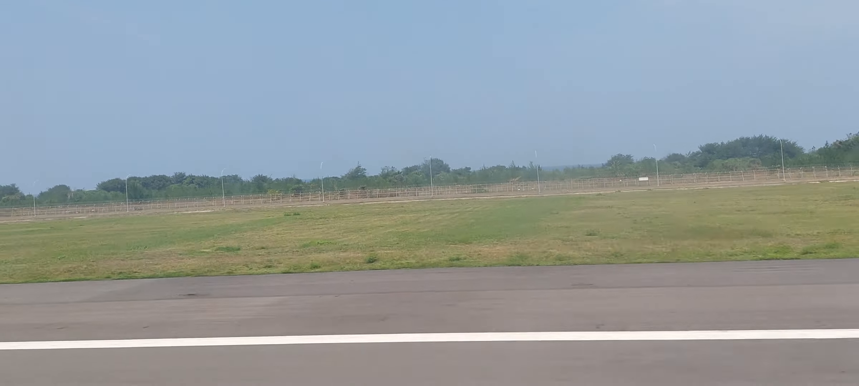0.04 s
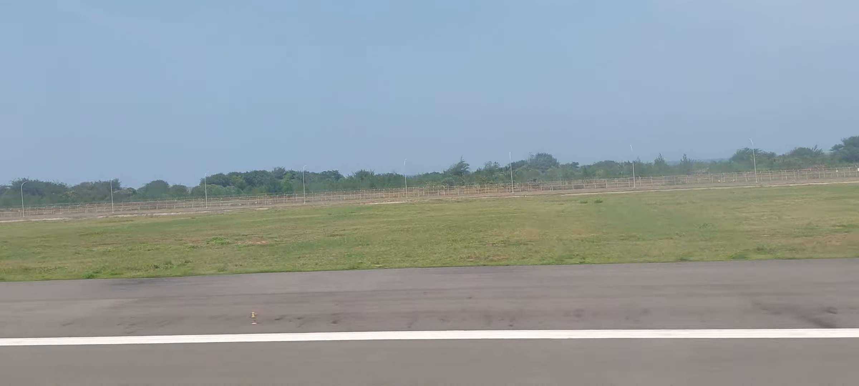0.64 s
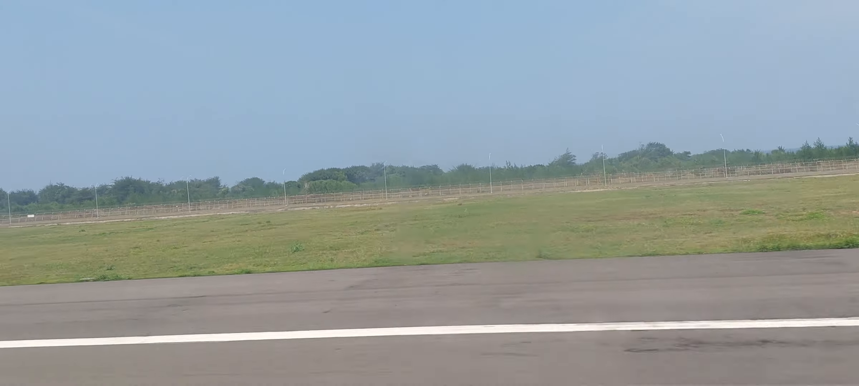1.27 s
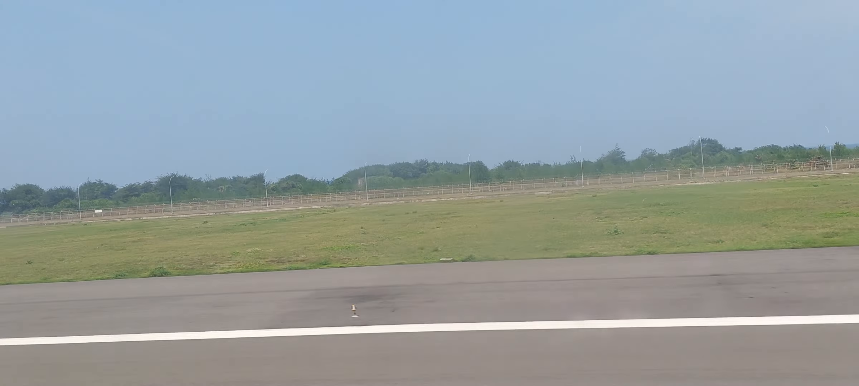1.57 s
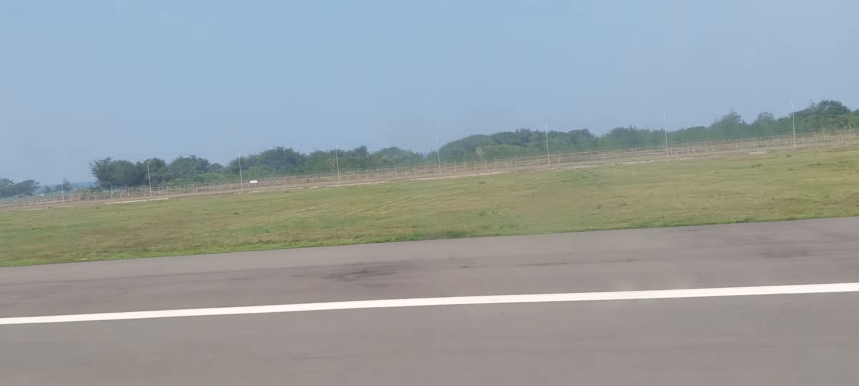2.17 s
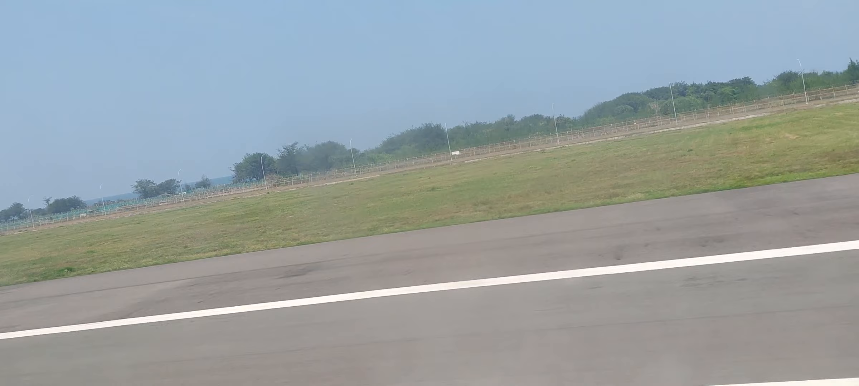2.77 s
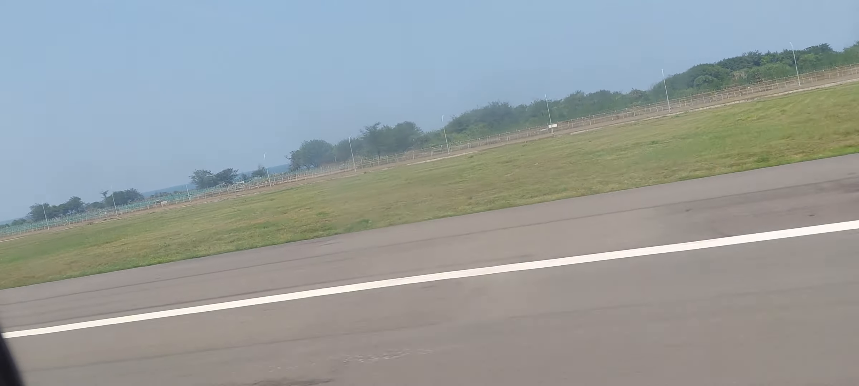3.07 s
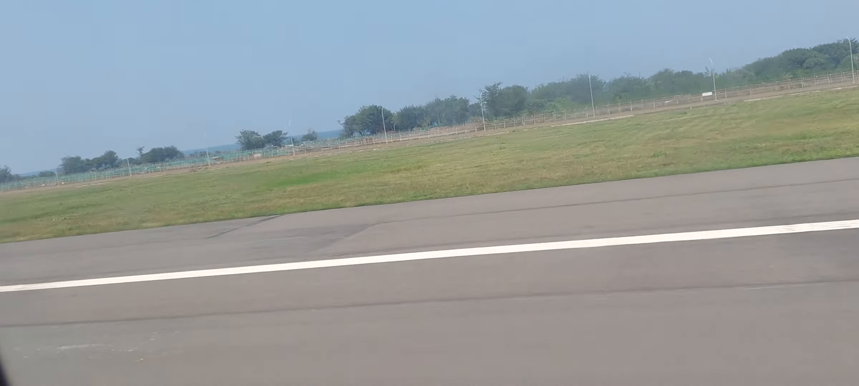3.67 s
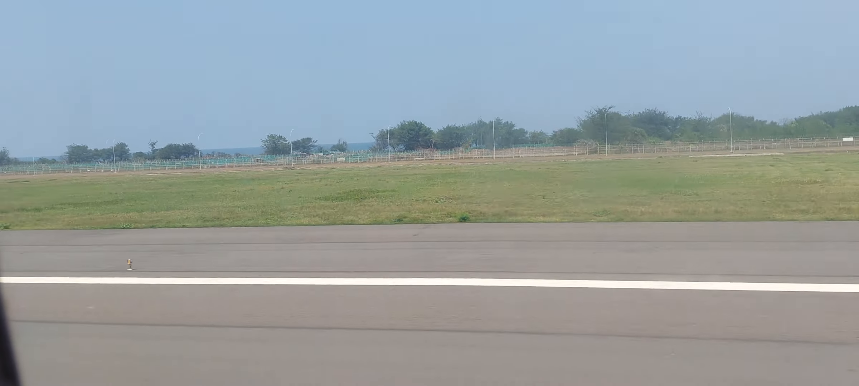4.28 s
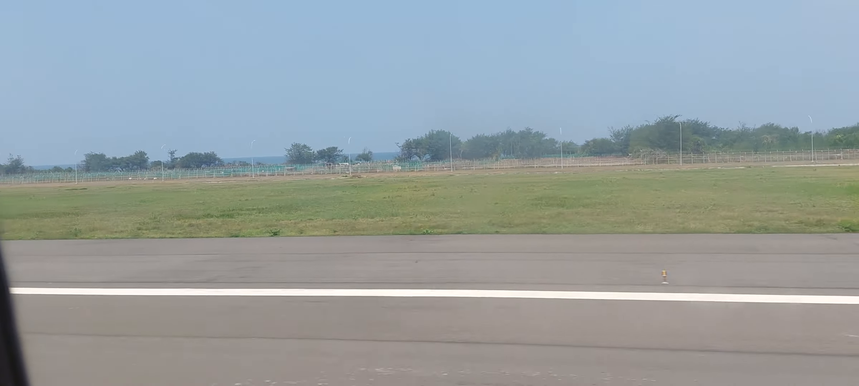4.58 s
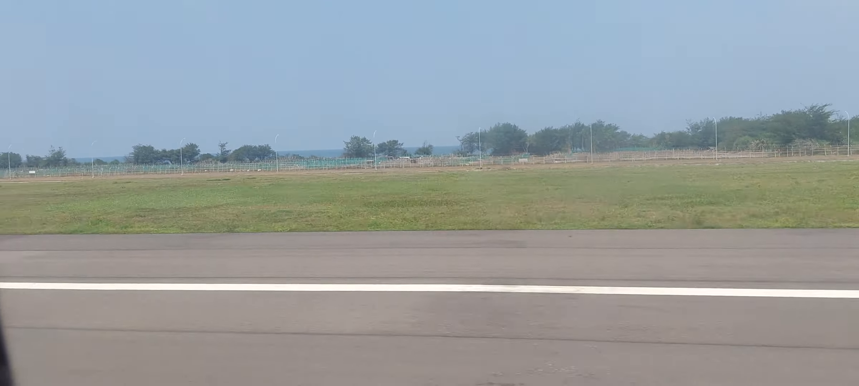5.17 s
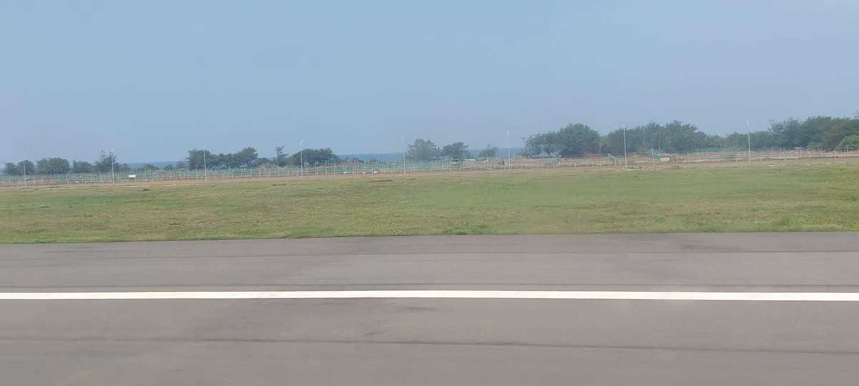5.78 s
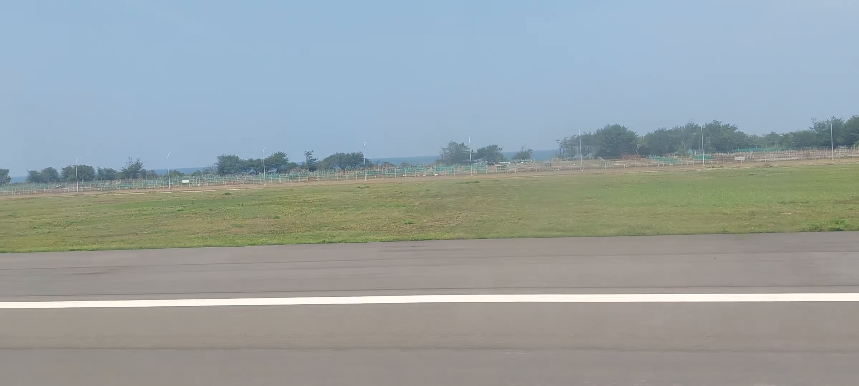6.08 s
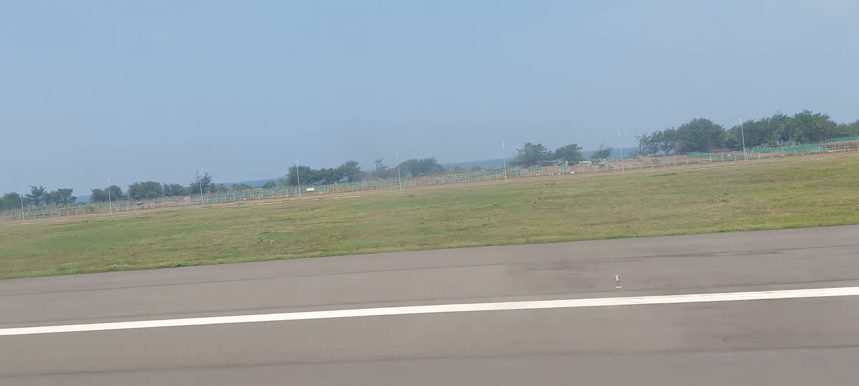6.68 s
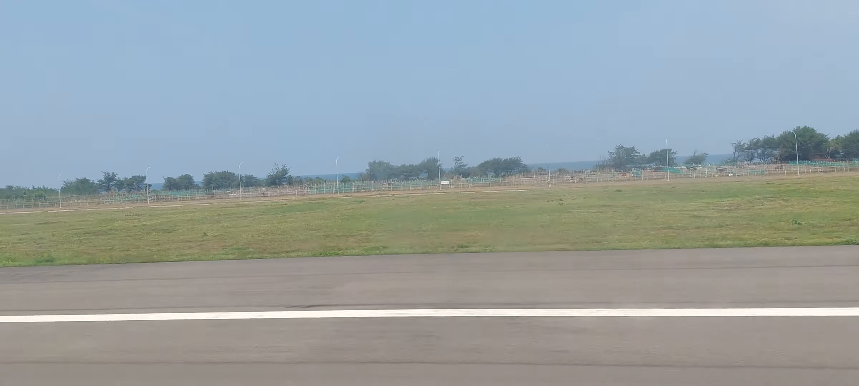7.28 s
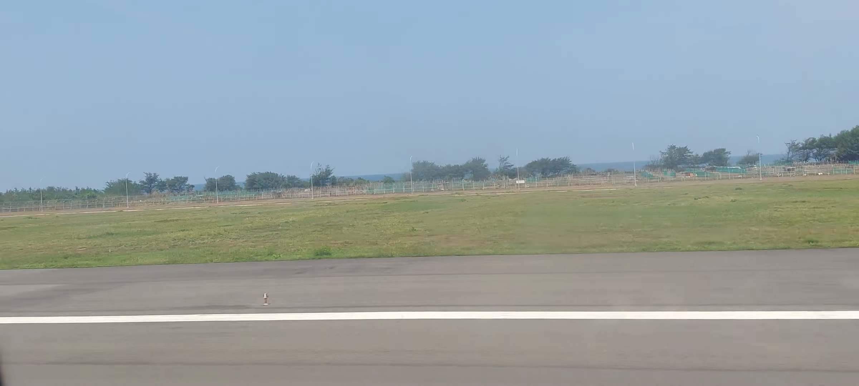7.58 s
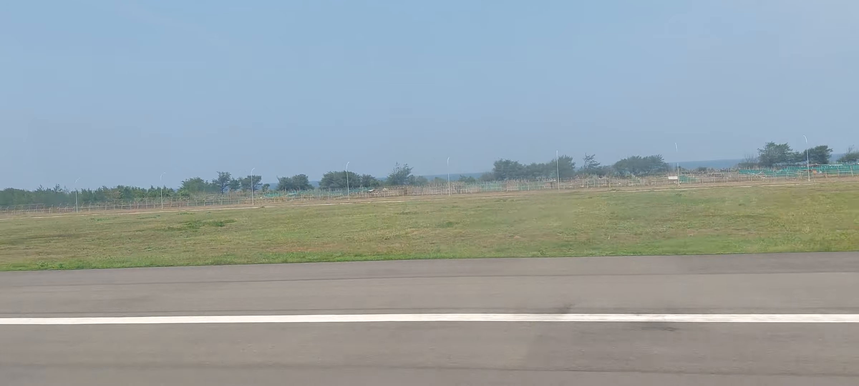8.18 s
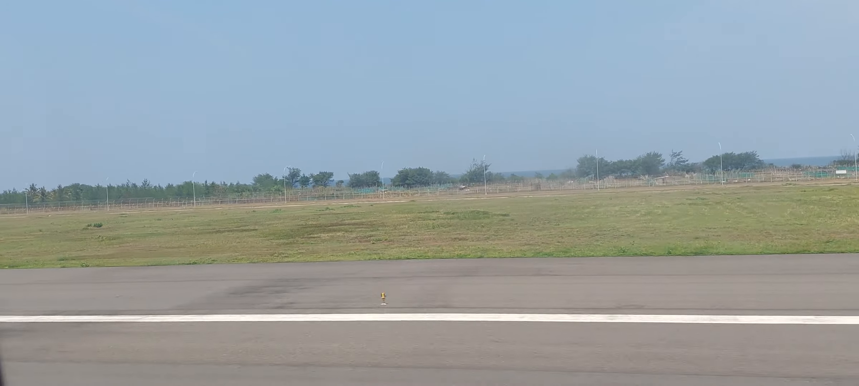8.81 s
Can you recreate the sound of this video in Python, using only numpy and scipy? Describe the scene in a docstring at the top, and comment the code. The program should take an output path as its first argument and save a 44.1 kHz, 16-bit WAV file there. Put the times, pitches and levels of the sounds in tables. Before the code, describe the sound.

An airliner gathers speed on a runway, heard inside the cabin: swelling engine roar, tyre rumble, hissing air and light rattles.

```python
"""A low undercarriage shudder comes first, as an airliner gathers speed on the runway.
Tyre rumble and engine roar swell through the fuselage, and air rushes along the skin.
Air hisses on the right, brighter for a while; trim panels chatter, jolts rattle loose fittings
and a faint fan whine emerges. Heard at a cabin window through the two microphone ports
of a hand-held phone, whose limiter holds the peaks."""
import sys
import numpy as np
from scipy import signal
from scipy.fft import rfft, irfft
from scipy.io import wavfile
from scipy.ndimage import uniform_filter1d, minimum_filter1d

SR = 44100
rng = np.random.default_rng(int(sys.argv[2]) if len(sys.argv) > 2 else 0)


def dump_mix(stems):
    """Bounce the given channels to the path in sys.argv[1] as a 16-bit WAV at rate SR."""
    frames = np.atleast_2d(stems).T  # one column per channel
    limited = np.clip(frames, -1, 1)  # hard clip at full scale
    pcm = np.round(limited * 32767).astype(np.int16)
    wavfile.write(sys.argv[1], SR, pcm)


N = 399105
T = np.arange(N) / SR
FREQ = np.fft.rfftfreq(N, 1 / SR)


def undb(db):
    """Decibels to gain."""
    return 10 ** (np.asarray(db) / 20)


def unit(x):
    """Scale to rms 1."""
    return x / np.sqrt(np.mean(x ** 2))


def pan(db):
    """Channel gains for a left minus right level."""
    return undb(np.array([[db], [-db]]) / 2)


def smooth(x, samples):
    """Two passes of a moving average."""
    return uniform_filter1d(uniform_filter1d(x, samples), samples)


def white():
    """Independent white noise, left and right."""
    return rng.standard_normal((2, N))


def walk(rate_hz):
    """Smooth random drift, rms 1."""
    hold = max(int(SR / rate_hz), 1)
    steps = np.repeat(rng.standard_normal(N // hold + 1), hold)
    return unit(smooth(steps, hold)[:N])


def curves(table):
    """The columns of a timed table, one value a sample."""
    times, *columns = np.transpose(table)
    return [np.interp(T, times, column) for column in columns]


def across(points):
    """A table over frequency, joined on a log axis."""
    hz, value = np.transpose(points)
    return np.interp(np.log(FREQ + 1), np.log(hz), value)


def colour(x, points):
    """Filter by a spectrum that rolls off past its ends; white noise keeps its power."""
    low_hz, high_hz = points[0][0], points[-1][0]
    ends = 1 / (1 + (low_hz / (FREQ + 1)) ** 4) / (1 + (FREQ / (2 * high_hz)) ** 6)
    return irfft(rfft(x) * unit(undb(across(points)) * ends), N)


def resonate(x, modes):
    """Filter by narrow peaks and dips."""
    gain_db = sum(db / (1 + (2 * (FREQ - hz) / width) ** 2) for hz, width, db in modes)
    return irfft(rfft(x) * undb(gain_db), N)


def spell(start, length, edge_s):
    """Envelope 0-1 that rises, holds and falls smoothly."""
    return (np.tanh(2 * (T - start) / edge_s) - np.tanh(2 * (T - start - length) / edge_s)) / 2


def lifts(table, edge_s):
    """Level change in dB from a table of passing spells."""
    return sum(db * spell(start, length, edge_s) for start, length, db in table)


def burst(start, t60, rise_s):
    """Envelope of one contact: quick rise, exponential decay."""
    age = np.clip(T - start, 0, None)
    return (1 - np.exp(-age / rise_s)) * np.exp(-np.minimum(np.log(1000) * age / t60, 50))


# Each row: start in seconds, length in seconds, level in dB.
SHUDDER_BOUTS = [(0.175, 0.11, -13.5), (0.479, 0.096, -12.5), (0.672, .27, -17), (1.119, 0.29, -19.5),
                 (1.38, .42, -13), (1.8, 0.33, -19.5), (2.8, 0.15, -14.5), (3.071, 0.54, -13),
                 (3.697, 0.081, -13.5), (4.244, 0.1, -15)]
# Each row: time in seconds, pitch in Hz.
SHUDDER_PITCH = [(0, 49), (.2, 55), (.8, 54.23), (1.45, 57.3), (2.0, 56.5), (2.45, 52.04), (2.85, 54.7),
                 (3.2, 53.3)]

def shudder(tremor_db=-21.5, waver_db=1.73, edge_s=.023):
    """The undercarriage shakes the fuselage at one low resonance, in bouts that stop as speed builds."""
    hz, = curves(SHUDDER_PITCH)
    tone = np.sqrt(2) * np.sin(2 * np.pi * np.cumsum(hz) / SR)
    bouts = sum(undb(db) * spell(start, length, edge_s) for start, length, db in SHUDDER_BOUTS)
    tremor = undb(tremor_db) * spell(0, 4, edge_s)
    return tone * np.hypot(bouts, tremor) * undb(waver_db * walk(18)) * pan(-4)


# Each row: frequency in Hz, correlation between the ports from 0 to 1.
PORT_LIKENESS = [(60, 0.98), (140, 0.98), (290, 0.92), (640, .42), (1300, 0)]
# Wall panel resonances. Each row: centre in Hz, width in Hz, gain in dB.
WALL_MODES = [(528, 34, 3.5), (770, 26, 0.5), (893, 60, 3), (917, 60, -3), (1030, 60, 2.5), (1290, 55, 1.5),
              (1920, 110, 2), (2100, 130, -2.5)]

def cabin_field():
    """Diffuse noise through the wall panels: alike at both ports in the bass, unrelated in the treble."""
    mid, side = rfft(white())
    like = np.clip(across(PORT_LIKENESS), 0, 1)
    ports = mid * np.sqrt(1 + like) + np.array([[1], [-1]]) * side * np.sqrt(1 - like)
    return resonate(irfft(ports, N), WALL_MODES)


# Each row: frequency in Hz, left minus right in dB.
PORT_BALANCE = [(60, -4), (110, -2.5), (200, -2.5), (290, 0.4), (380, 0.17), (700, -2)]

def drone(spectrum, span_s):
    """Low cabin noise, its power held steady over spans longer than span_s."""
    balance = undb(np.array([[1], [-1]]) * across(PORT_BALANCE) / 2)
    noise = colour(irfft(rfft(cabin_field()) * balance, N), spectrum)
    power = smooth(noise.mean(axis=0) ** 2, int(span_s * SR))
    return noise / np.sqrt(power + 1e-12)


# Each row: time in seconds, relative level in dB.
ROAR_LEVEL = [(0, -27), (1.2, -26.7), (1.6, -25), (2.15, -25), (2.6, -21.5), (3.15, -22.5), (4.05, -15.5),
              (4.3, -17), (4.65, -15), (5.8, -15), (7.3, -16), (9.05, -15.5)]
# Each row: frequency in Hz, relative level in dB.
ENGINE_SPECTRUM = [(130, -15.5), (175, -3), (220, 0.5), (265, -6.5), (300, -10), (350, -11), (410, -16.5),
                   (470, -26.5), (540, -28.5), (680, -34), (880, -37.5), (1100, -53)]

def engines(gain_db=.5, sway_db=.23):
    """The engine roar builds behind the wall, then holds."""
    level_db = curves(ROAR_LEVEL)[0] + gain_db + sway_db * walk(5)
    return drone(ENGINE_SPECTRUM, span_s=.15) * undb(level_db)


def with_roar(full_db, growth, full_roar_db=-16):
    """Level in dB: full_db at full roar, moving by growth dB per dB of roar."""
    return full_db + growth * (curves(ROAR_LEVEL)[0] - full_roar_db)


# Each row: frequency in Hz, relative level in dB.
TYRE_SPECTRUM = [(22, -33.5), (35, -18), (50, -8), (75, -3), (105, -1), (135, .5), (175, -7), (230, -20.5),
                 (400, -55)]
# Each row: start in seconds, length in seconds, lift in dB.
ROUGH_STRETCHES = [(2.2, 0.25, 4.5), (2.47, .53, 2), (3.85, 1.12, 2.5), (5.2, 0.36, 1.5), (6.25, 0.27, 2)]

def tyres():
    """Tyres drum through the floor, harder on rough stretches of runway."""
    level_db = with_roar(full_db=-12.5, growth=.74) + lifts(ROUGH_STRETCHES, edge_s=.058)
    return drone(TYRE_SPECTRUM, span_s=.2) * undb(level_db)


# Each row: frequency in Hz, left and right relative levels in dB.
RUSH_SPECTRA = [(358, -70.5, -66.5), (526, -68.5, -66.5), (670, -72, -69), (850, -76, -71.5),
                (1050, -77, -72), (1280, -79, -76), (1600, -82, -75.5), (2060, -86, -83), (3250, -93, -100),
                (4400, -97, -108), (5630, -101, -104), (8500, -108, -119), (9900, -110, -115),
                (11600, -108, -104), (15300, -114, -120)]
# Runway bumps. Each row: start in seconds, length in seconds, lift of the trim chatter in dB.
BUMPS = [(.35, 0.45, 5.5), (.85, 0.35, 4.5), (1.32, 0.15, 6.5), (5.15, 0.3, 3.5)]

def rush(bump_share=.2, flutter_db=.46):
    """Air rushes along the skin, louder with speed and on bumps; each port hears its own colour."""
    table = np.array(RUSH_SPECTRA)
    shapes = undb([across(table[:, [0, port]]) for port in (1, 2)])
    low_cut = 1 / (1 + (table[0, 0] / (FREQ + 1)) ** 4)
    air = irfft(rfft(cabin_field()) * shapes * low_cut, N)
    level_db = with_roar(full_db=-42.5, growth=.52) + bump_share * lifts(BUMPS, edge_s=.04)
    return air / np.std(air.mean(axis=0)) * undb(level_db + flutter_db * walk(12))


# Each row: time in seconds, relative level in dB.
HISS_LEVEL = [(0, -69), (.8, -62), (1.5, -60), (2.05, -54), (3.2, -55), (4.15, -54), (5.0, -52.5),
              (6.3, -52.5), (7.6, -57.5), (9.05, -54.5)]
# Brief swells and dips. Each row: start in seconds, length in seconds, change in dB.
HISS_GUSTS = [(.68, 0.093, 4), (.92, 0.21, 2.5), (1.3, .14, 4.5), (1.62, 0.086, 4.5), (2.52, .2, 1.5),
              (3.55, .2, 2.5), (5.62, .28, -6), (6.38, .85, -5), (7.25, .14, 3)]
# Each row: time in seconds, low-pass cutoff in Hz.
HISS_CUTOFF = [(0, 2900), (1.2, 3190), (1.82, 4430), (2.0, 7345), (4.0, 7200), (4.75, 6200), (5.05, 4880),
               (5.25, 3550), (5.75, 2940), (9.05, 3265)]
# Body of the hiss and the sizzle above it. Each row: frequency in Hz, relative level in dB.
HISS_SPECTRUM = [(1300, -5.5), (2000, 7.5), (2600, 4.5), (3400, -1.5), (4400, -3), (5200, -8), (6100, -10),
                 (7000, -10.5), (10000, -11)]
SIZZLE_SPECTRUM = [(8500, -12.5), (10500, -8.5), (11700, -3), (13000, -2), (15500, -7)]

def hiss(gain_db=-3, order=8, peak_db=3):
    """Air hisses close to the right port in uneven patches; it brightens quickly and dulls again."""
    hz, frame_s, frames = signal.stft(colour(white(), HISS_SPECTRUM), SR, nperseg=512)
    cutoff_hz = curves(HISS_CUTOFF)[0] * (1 + .04 * walk(14))
    ratio = hz[:, None] / np.interp(frame_s, T, cutoff_hz)
    peak = undb(peak_db * np.exp(-((ratio - .82) / .081) ** 2))
    low_pass = peak / np.sqrt(1 + ratio ** (2 * order))
    # Eddies lift patches about 1 kHz wide and 50 ms long.
    eddies = uniform_filter1d(rng.standard_normal(ratio.shape), size=11, axis=0)
    eddies = unit(uniform_filter1d(eddies, size=9, axis=1))
    body = signal.istft(frames * low_pass * undb(1.6 * eddies), SR)[1][:, :N]
    sizzle_db = -29 + 18 * spell(start=1.92, length=3.4, edge_s=.15) + .9 * walk(12)
    sizzle = colour(white() * undb(1.5 * walk(500)), SIZZLE_SPECTRUM) * undb(sizzle_db)
    flicker = undb(.9 * walk(22))
    level_db = curves(HISS_LEVEL)[0] + lifts(HISS_GUSTS, edge_s=.04) + gain_db
    return (body + sizzle) * flicker * undb(level_db) * pan(-16)


# Each row: start in seconds, relative level in dB, left minus right in dB.
TRIM_TICKS = [(1.4187, -52, 8), (5.19, -47, -1), (5.275, -45.5, 3), (5.363, -44.5, 1.5), (5.451, -46.5, 2),
              (5.9105, -45, 2), (6.108, -48, 4), (6.1624, -47, 0), (6.2133, -46, 3.5), (6.327, -47, 3),
              (6.5585, -47, 6), (6.5974, -49, 4.5), (7.2454, -49, 7), (8.1165, -49.5, 9),
              (8.4806, -51.5, 11), (8.6991, -49, 4), (8.8917, -43.5, 7)]
# Each row: frequency in Hz, relative level in dB.
TRIM_SPECTRUM = [(1000, 4), (2000, 7.5), (3200, 4.5), (5500, 0.5), (7500, -1.5), (9500, -3), (12000, -2.5),
                 (15500, -3.5)]
# Each row: centre in Hz, width in Hz, gain in dB.
TRIM_MODES = [(4400, 400, 1.5), (5560, 350, 4), (12100, 600, 3)]

def trim(tick_gain_db=-3, contacts_per_s=450, scatter_db=2, contact_t60_s=.025):
    """Plastic panels chatter in many small contacts, harder on bumps, and now and then tick sharply."""
    ticks = sum(burst(start, t60=.068, rise_s=.0006) * undb(db + tick_gain_db) * pan(side)
                for start, db, side in TRIM_TICKS)
    contacts = rng.random(N) < contacts_per_s / SR
    strength = undb(scatter_db * np.minimum(rng.exponential(size=N), 3))
    decay = np.exp(-np.log(1000) / (contact_t60_s * SR))
    chatter = unit(signal.lfilter([1], [1, -decay], contacts * strength))
    shaking_db = with_roar(full_db=-64.5, growth=.45) + lifts(BUMPS, edge_s=.04) + 1.3 * walk(26)
    envelope = np.hypot(ticks, chatter * undb(shaking_db) * pan(5))
    return resonate(colour(white() * envelope, TRIM_SPECTRUM), TRIM_MODES)


# Each row: start in seconds, relative level in dB, ring time in seconds, left minus right in dB.
JOLTS = [(.338, -60, .05, 11), (.488, -54, .05, 3), (.514, -55, 0.055, 9), (.579, -51, .05, 7),
         (.691, -51, 0.055, 9), (.735, -51, 0.057, 4), (2.01, -49, 0.23, -6), (2.064, -49, .1, -3),
         (2.085, -47, .07, -8), (2.171, -48, 0.14, -8), (2.186, -50.5, 0.27, -8), (2.232, -51, 0.19, -6),
         (2.335, -40, 0.11, -9), (2.633, -51, 0.16, -11), (2.68, -50, .08, -8), (2.838, -50, .05, -14),
         (2.976, -45.5, 0.05, -12), (3.058, -47.5, .04, -10), (3.326, -44.5, 0.14, -10),
         (3.421, -44, 0.14, -10), (3.54, -41, 0.024, -9), (3.66, -58.5, 0.27, -5), (3.87, -54, .3, -14),
         (4.183, -44, .025, -3), (4.964, -45, 0.081, -7)]
# Each row: frequency in Hz, relative level in dB.
FITTING_SPECTRUM = [(600, -0.5), (1500, 0), (4000, 1), (6500, -3.5), (9500, -10.5), (12800, -1),
                    (15500, -4.5)]
# Each row: centre in Hz, width in Hz, gain in dB.
FITTING_MODES = [(2600, 200, 7), (4400, 400, 3.5), (5170, 400, -1.5), (6160, 500, 3)]

def rattles(gain_db=.9, grain_db=2.4):
    """Each jolt sets a loose fitting buzzing in a short, grainy burst."""
    force = sum(burst(start, t60, rise_s=.0018) * undb(db) * pan(side) for start, db, t60, side in JOLTS)
    buzz = white() * force * undb(gain_db + grain_db * walk(900))
    return resonate(colour(buzz, FITTING_SPECTRUM), FITTING_MODES)


# Each row: start in seconds, level in dB, ring time in seconds.
KNOCKS = [(1.345, -47, .35), (2.338, -38.5, .12)]
# Each row: frequency in Hz, relative level in dB.
KNOCK_SPECTRUM = [(500, 1), (800, 3.5), (1400, 1), (2000, 1.5), (3000, -5), (5000, -19)]

def knocks():
    """The heaviest jolts knock the side panel."""
    force = sum(burst(start, t60, rise_s=.0015) * undb(db) for start, db, t60 in KNOCKS)
    return colour(white() * force * pan(-3), KNOCK_SPECTRUM)


# Each row: time in seconds, pitch in Hz, level in dB.
FAN_TONE = [(3.5, 1720, -73.5), (5.8, 1773, -62), (7, 1752, -59.5), (9.05, 1716, -61)]

def fan_whine(waver_hz=4, waver_db=2.5):
    """The engine fan gives a faint tone, unsteady in pitch and level."""
    hz, db = curves(FAN_TONE)
    phase = 2 * np.pi * np.cumsum(hz + waver_hz * walk(40)) / SR
    return np.sin(phase) * undb(db + waver_db * walk(10)) * pan(-7)


def scene():
    """Everything heard at the window seat."""
    return shudder() + engines() + tyres() + rush() + hiss() + trim() + rattles() + knocks() + fan_whine()


def record(dry, ceiling=.9, window_s=.012, fade_s=.004, top_hz=15600):
    """A look-ahead limiter ducks the highest crests, then the top is cut."""
    window = int(window_s * SR)
    allowed_gain = np.minimum(1, ceiling / (np.abs(dry).max(axis=0) + 1e-9))
    gain = smooth(minimum_filter1d(allowed_gain, 2 * window), window)
    fades = np.sin(np.pi / 2 * np.minimum(np.minimum(T, T[-1] - T) / fade_s, 1)) ** 2
    low_pass = signal.ellip(10, .1, 80, top_hz, fs=SR, output="sos")
    return signal.sosfilt(low_pass, dry * gain * fades)


dry = scene()
out = record(dry)
dump_mix(out)
```